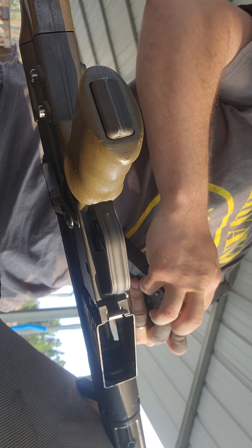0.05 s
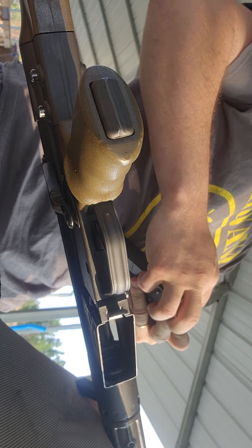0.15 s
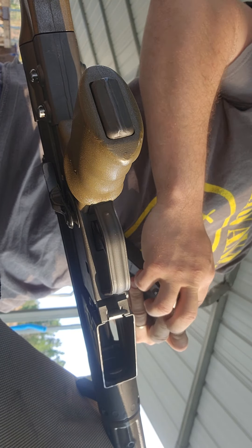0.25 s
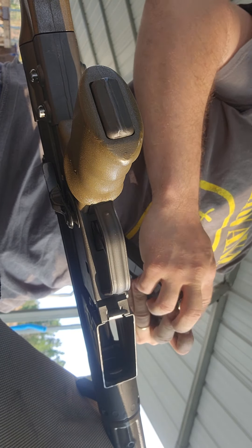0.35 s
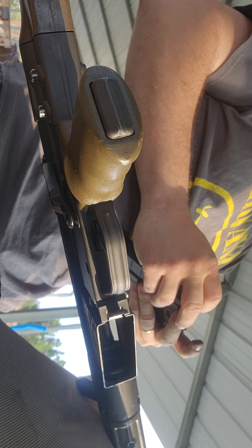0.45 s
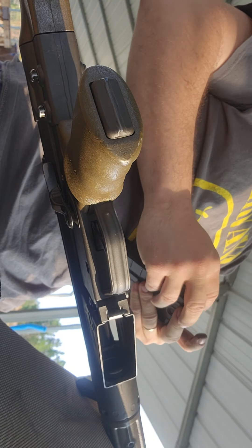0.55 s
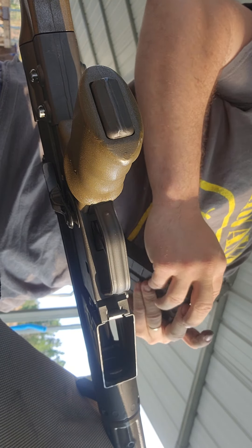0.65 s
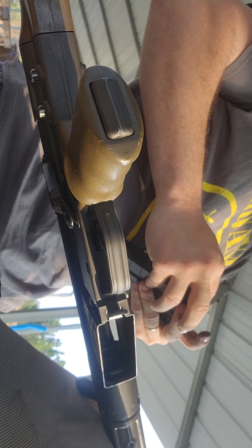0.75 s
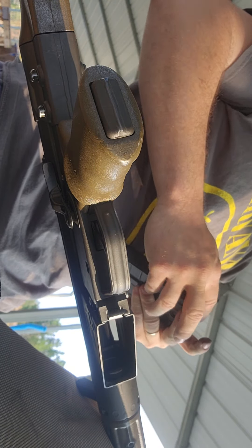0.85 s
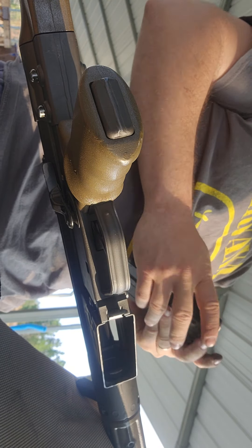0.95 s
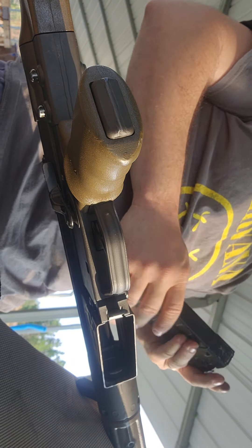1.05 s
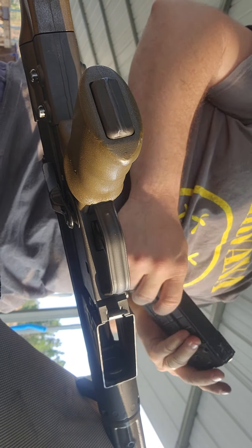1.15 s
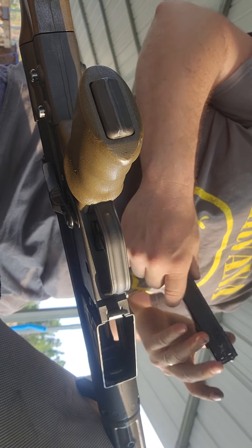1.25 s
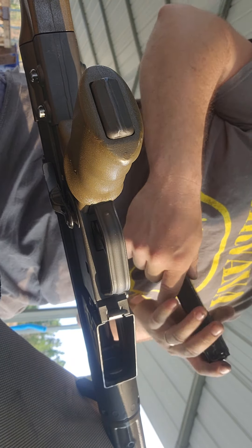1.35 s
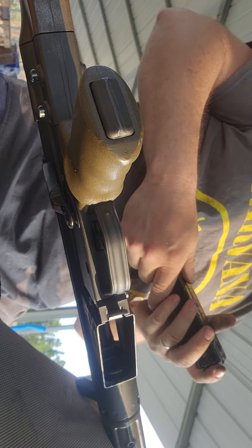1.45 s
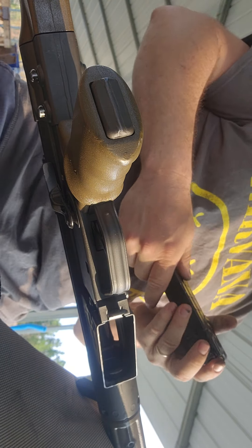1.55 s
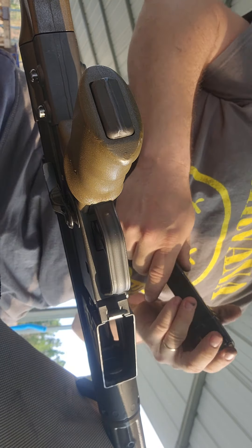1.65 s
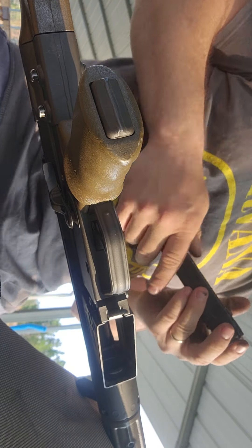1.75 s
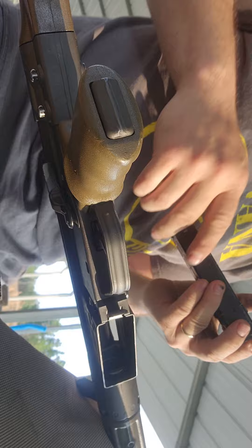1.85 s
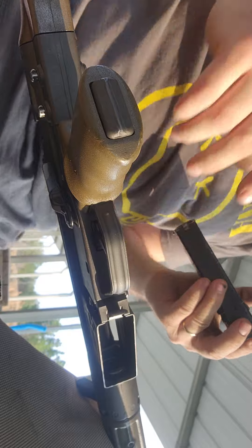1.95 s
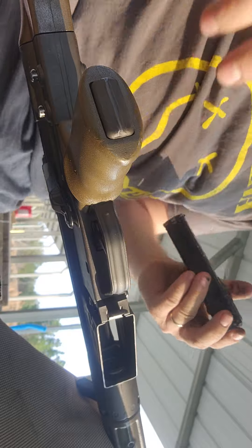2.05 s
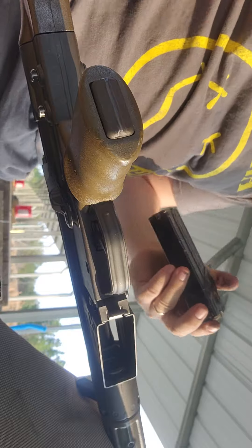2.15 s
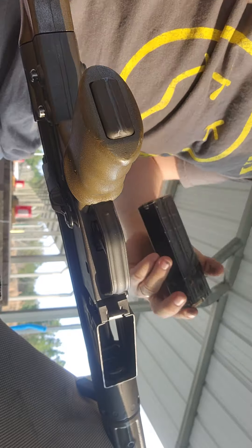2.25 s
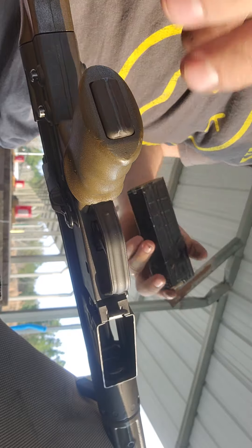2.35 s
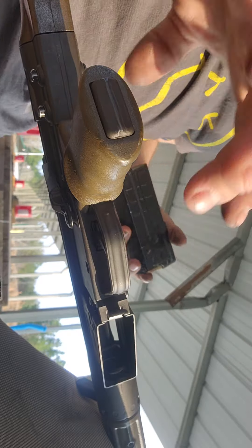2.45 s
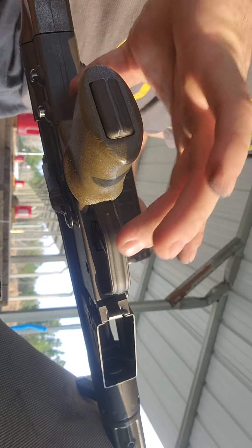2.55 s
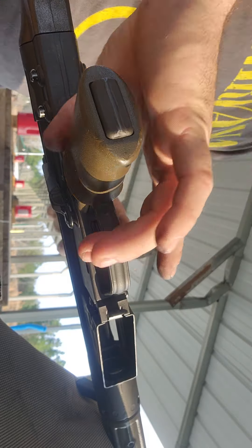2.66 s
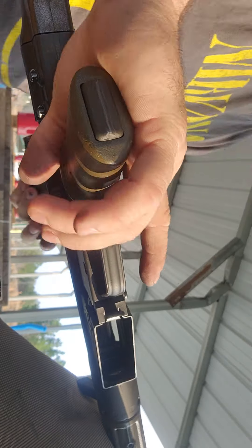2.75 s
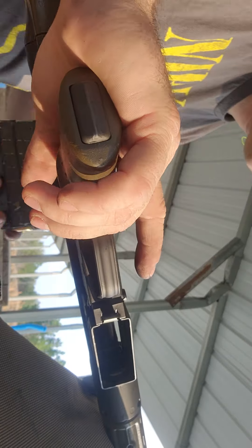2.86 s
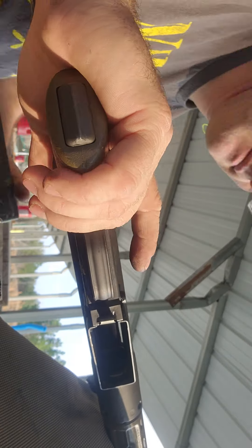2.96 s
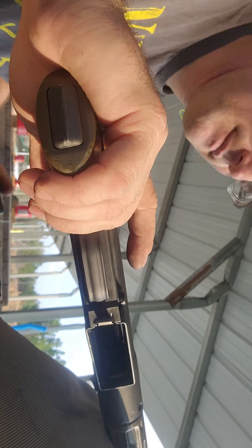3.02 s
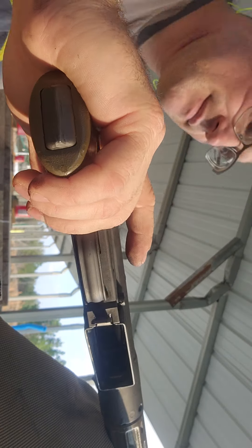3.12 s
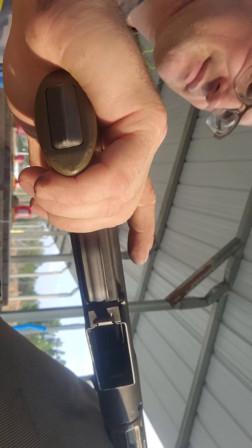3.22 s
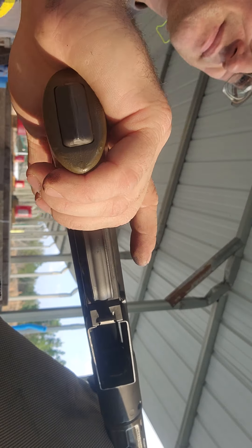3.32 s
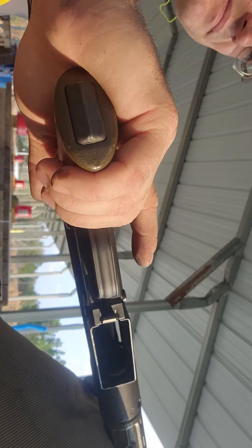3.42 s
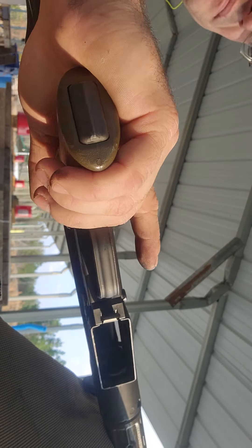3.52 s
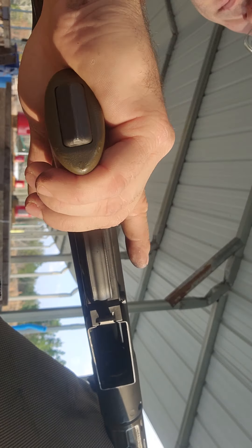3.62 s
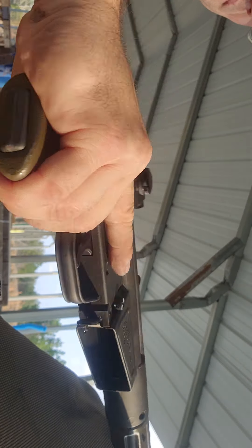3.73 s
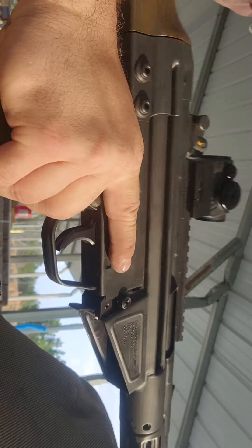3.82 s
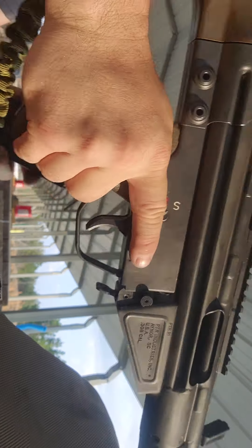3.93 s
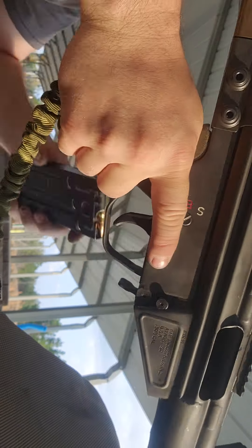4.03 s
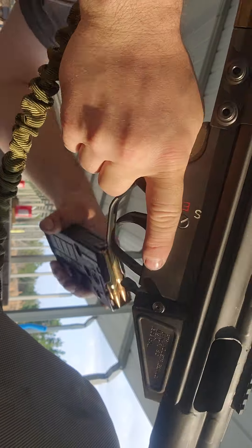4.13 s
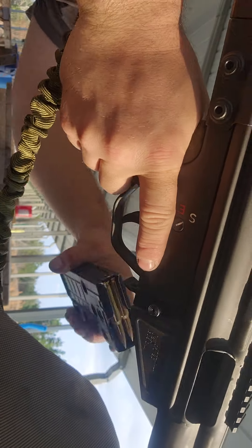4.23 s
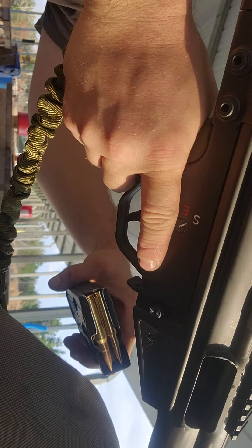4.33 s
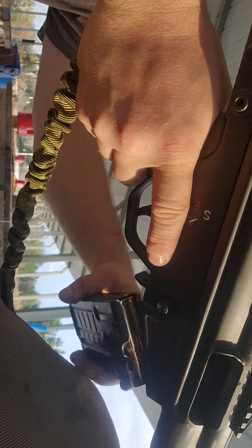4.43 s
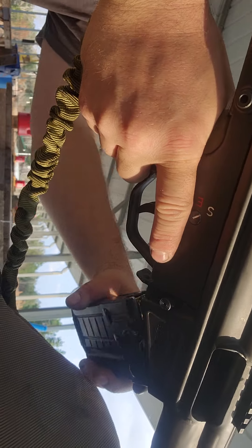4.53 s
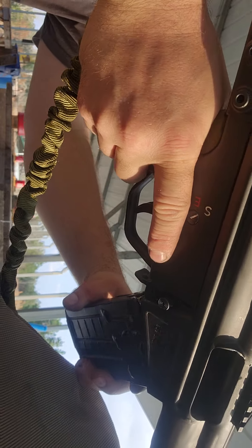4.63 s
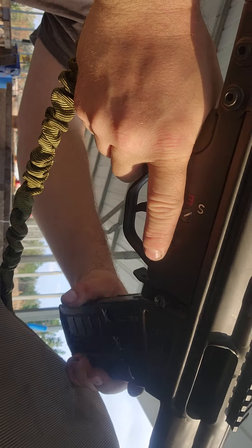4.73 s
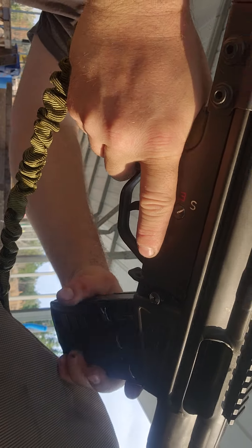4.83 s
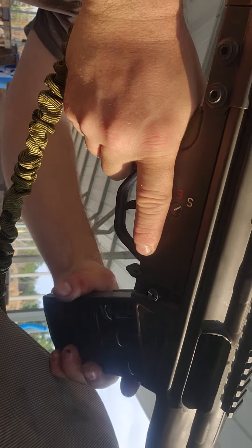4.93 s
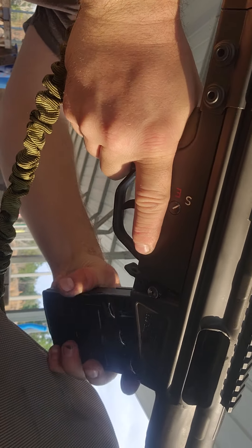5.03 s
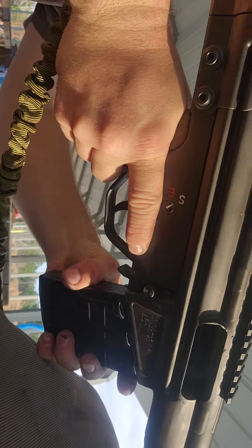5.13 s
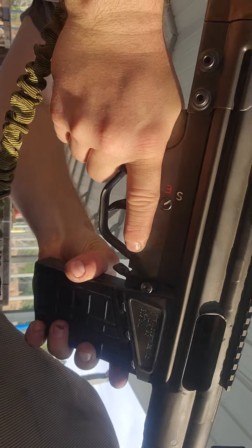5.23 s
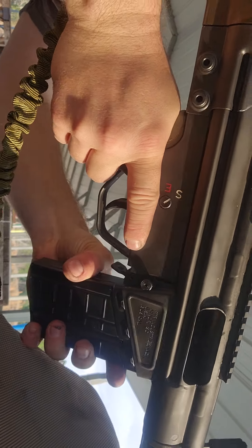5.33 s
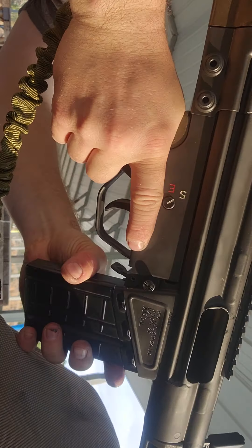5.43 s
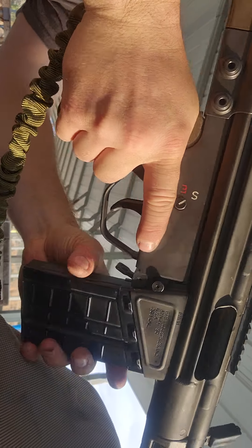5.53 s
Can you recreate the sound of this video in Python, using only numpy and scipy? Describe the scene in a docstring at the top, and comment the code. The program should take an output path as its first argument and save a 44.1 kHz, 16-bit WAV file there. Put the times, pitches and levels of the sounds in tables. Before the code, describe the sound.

Close stereo sound beneath a tin roof, over faint swelling outdoor rumble and thin steady hiss. Two small metallic ticks come just before 0.1 s, a scrape follows, and at 0.24 s a cartridge snaps hard into a thin steel magazine, ringing hollowly with a short spring twang. From 0.4 to 2 s there are only tiny taps, faint scrapes and soft cloth and finger rustles; another rustle passes near 2.55 s. At 2.9 s a dull distant shot thuds and rolls away. A hollow stock knock sounds at 4.05 s, then low swaying thumps at 4.3 s. Firm steel clunks strike the magazine well at 4.6 and 4.8 s, with quick clatter and gritty scraping until 5.0 s. The heaviest seating blow lands at 5.18 s, followed by scraping and a brief squeak into a bright, sharp catch snap at 5.33 s that echoes off the roof, leaving quiet low movement.

```python
"""A cartridge snaps into a steel rifle magazine right at the microphone, under the tin roof of a shooting range.
The magazine is turned in the hands, tapped against the rifle, scraped up its well and slammed home until
the catch snaps over. Each blow is bright steel ticks (shaped noise) plus the ringing modes of the struck part.
Scrapes and rustling sleeves are grainy noise, the rifle sways as a low decaying tone, a far shot thuds;
the roof reverberates, and faint outdoor rumble and hiss lie behind it all."""
import sys
import numpy as np
from scipy import signal
from scipy.fft import rfft, irfft, next_fast_len
from scipy.io import wavfile

SR = 44100
rng = np.random.default_rng(int(sys.argv[2]) if len(sys.argv) > 2 else 0)


def unload_audio(sound):
    """Save the sound as a 16-bit wav file, at the path given as the first command line argument."""
    columns = np.transpose(np.atleast_2d(sound))
    # keep every value between -1 and 1, then stretch to whole-number steps
    steps = np.round(np.clip(columns, -1, 1) * 32767)
    wavfile.write(sys.argv[1], SR, steps.astype(np.int16))


N = 246078
TIME = np.arange(N) / SR
AGE = TIME[:SR // 5]  # s since a contact

# Blows on the magazine, at the microphone. Columns: start_s [s], tick_db of the edge [dB], ring_db of the body [dB],
# seat_s from first touch until the part seats [s], high_hz above which little rings [Hz]
MAGAZINE_BLOWS = [ (0.0620, -33, -31, 0.00061, 5200), (0.0852, -36, -31, 0.0062, 2198),
                  (0.2433, -13, -13, 0.0036, 4540), (0.4325, -66, -44, 0.00046, 3400),
                  (0.4465, -72, -33.5, 0.00057, 3560), (0.5965, -82, -51, 0.0012, 1160),
                  (0.6545, -81.5, -46.5, 0.00043, 3100), (0.9590, -53, -49, 0.00051, 1840),
                  (0.9730, -45, -46, .001, 4080), (1.0432, -63.5, -45, 0.00036, 1070),
                  (1.1765, -59, -52, 0.00034, 1000), (1.6030, -55.5, -51, 0.0023, 1200),
                  (1.8255, -57.5, -58.5, .001, 2000), (1.9730, -48.5, -55, 0.0011, 3000),
                  (4.3400, -47, -57, 0.00046, 6260)]
# Modes of the magazine. Columns: pitch_hz [Hz], relative level_db [dB], t60_s [s]
MAGAZINE_MODES = [(349, -11, 0.085), (410, -8.5, 0.056), (561, -11, .04), (664, -1, 0.072),
                  (732, -1, 0.066), (1000, 1.5, 0.021), (1171, -8, 0.076), (1366, -6, 0.03),
                  (1437, -24.5, .14), (1590, -14.5, 0.023), (2250, -15.5, .09), (2495, -2.5, 0.014),
                  (2933, -7, .025), (3410, -20, .06), (5213, -16.5, 0.05), (5146, -19, 0.069),
                  (6240, -23.5, 0.09), (7500, -16, 0.054)]


def magazine():
    """The thin steel body rings when the cartridge, hands or rifle strike it."""
    return blows(MAGAZINE_BLOWS, MAGAZINE_MODES, lowest_hz=860, bounce_db=-8.0, tick_t60=0.042, pan_db=-7.5,
                 clatter_db=-6.5, clatter_t60=.04, tick_roof_db=0.0, ring_roof_db=-9.5)


# Blows of the magazine in the rifle's well.
# Columns: start_s [s], tick_db [dB], ring_db [dB], seat_s [s], high_hz [Hz]
RIFLE_BLOWS = [ (4.602, -26, -20.5, .002, 2420), (4.813, -34, -25, 0.0051, 2740),
               (4.8420, -43.5, -37.5, 0.0017, 4000), (4.8906, -50, -42.5, 0.0019, 2000),
               (4.9191, -33.5, -28.5, .0007, 2400), (4.999, -29.5, -28, 0.0074, 3320),
               (5.1840, -20.5, -13.5, 0.0012, 3020)]
# Modes of the receiver. Columns: pitch_hz [Hz], relative level_db [dB], t60_s [s]
RIFLE_MODES = [(125, 0, 0.11), (267, -14.5, 0.061), (381, -2, 0.018), (500, 2.5, 0.049), (590, -3, 0.034),
               (810, -15, 0.11), (1000, -23, 0.011), (1164, -5, 0.058), (1190, -7.5, 0.07),
               (1450, 5.5, 0.028), (1500, 4, 0.012), (1910, -10, 0.021), (2163, -4.5, 0.076),
               (2300, -8, 0.01), (2790, -7.5, .04), (3860, -17, 0.067), (4163, 6, 0.023), (4760, 2.5, 0.09),
               (6550, -28, .045)]


def rifle_well():
    """The receiver rings as the magazine strikes the inside of its well."""
    return blows(RIFLE_BLOWS, RIFLE_MODES, lowest_hz=557, bounce_db=-11.5, tick_t60=0.019, pan_db=-9.5,
                 clatter_db=-2.0, clatter_t60=0.044, tick_roof_db=-2.0, ring_roof_db=-12.5)


# The catch snapping over. Columns: start_s [s], tick_db [dB], ring_db [dB], seat_s [s], high_hz [Hz]
CATCH_BLOWS = [(5.3316, -15, -16.5, .0004, 11800)]
# Modes of the catch. Columns: pitch_hz [Hz], relative level_db [dB], t60_s [s]
CATCH_MODES = [(470, -31, 0.04), (647, -1.5, 0.07), (1030, -23, 0.076), (1454, 15.5, 0.045),
               (1600, -14, .04), (2054, 13, 0.019), (2950, 8.5, 0.037), (3680, -27, .04), (4060, -6, 0.072),
               (5440, 10.5, 0.029), (6260, 11, 0.032), (7900, 1, 0.047), (8100, -9, 0.031),
               (12600, 20, 0.0085), (14070, 4, .03)]


def catch():
    """The small catch rings brightly as it snaps over."""
    return blows(CATCH_BLOWS, CATCH_MODES, lowest_hz=545, bounce_db=-22, tick_t60=0.015, pan_db=9,
                 clatter_db=-13.5, clatter_t60=0.13, tick_roof_db=6.5, ring_roof_db=-2.5)


# Dull knocks against the rifle's stock and guard.
# Columns: start_s [s], tick_db [dB], ring_db [dB], seat_s [s], high_hz [Hz]
STOCK_KNOCKS = [(0.1375, -58, -44.5, 0.00045, 1112), (3.9115, -82, -50.5, 0.00058, 2180),
                (4.0495, -55.5, -24, 0.0006, 2620), (4.1685, -48.5, -46.5, 0.00048, 3000),
                (5.1175, -72, -48, 0.00039, 2200)]
# Modes of the stock. Columns: pitch_hz [Hz], relative level_db [dB], t60_s [s]
STOCK_MODES = [(293, 2, 0.021), (738, -11.5, 0.12), (856, -10.5, 0.024), (1030, -1, 0.0058),
               (1101, 5, 0.063), (1180, 8.5, 0.031), (1540, -3.5, 0.02), (2000, -11, 0.047),
               (2180, -23, 0.0087), (3000, -14, 0.0081)]


def knocks():
    """The stock and guard answer a touch with a dull ring."""
    return blows(STOCK_KNOCKS, STOCK_MODES, lowest_hz=520, bounce_db=-14, tick_t60=0.025, pan_db=-4,
                 clatter_db=-8.5, clatter_t60=0.07, tick_roof_db=3, ring_roof_db=-14.0)


# Modes of the magazine's spring. Columns: pitch_hz [Hz], relative level_db [dB], t60_s [s]
SPRING_MODES = [(1430, -8, 0.17), (2280, 0, .09)]


def spring(start_s=.2835, level_db=-33):
    """The magazine's spring settles under the new cartridge and rings briefly."""
    out = np.zeros((2, N))
    twang = ring(SPRING_MODES) * (1 - fade(AGE, .012))
    add(out, start_s, level(twang, level_db))
    return out


# Colour of a steel tick. Columns: pitch_hz [Hz], gain_db [dB]
TICK_COLOUR = [(200, -21.5), (700, -5), (1500, 0), (3000, -8), (4800, 1.5), (7500, -1), (10300, -11.5),
               (12500, -3), (14500, -5.5), (16000, -3.5)]


def blows(rows, modes, lowest_hz, bounce_db, tick_t60, pan_db, clatter_db, clatter_t60, tick_roof_db, ring_roof_db):
    """Each contact rings the part, shakes what is loose in it and ticks; returns near sound and roof feed."""
    rings, ticks = np.zeros((2, 2, N))
    deeper_oct_per_db = .085
    pan = undb(np.array([[pan_db], [-pan_db]]) / 2)  # positive leans left
    for s, ring_db, tick_db, force_db, high_hz in contacts(rows, bounce_db):
        clatter = shape(ports(len(AGE), 1100) * fade(AGE, clatter_t60), lambda hz: low_pass(hz, 2300))
        body = level(ring(modes), 0) + level(clatter, clatter_db)
        # firmer blows reach lower modes; each blow has its own upper limit
        low_hz = lowest_hz / 2 ** (deeper_oct_per_db * max(force_db, 0))
        body = shape(body, lambda hz: 1 / np.sqrt((1 + (low_hz / hz) ** 4) * (1 + (hz / high_hz) ** 6)))
        # the bite swells in about a millisecond, then decays
        bite = (fade(AGE, tick_t60) + .8 * fade(AGE, 0.0027)) * (1 - fade(AGE, .004))
        tick = shape(ports(len(AGE), 1300) * bite, lambda hz: undb(at(TICK_COLOUR, hz)))
        add(rings, s, level(body, ring_db))
        add(ticks, s, level(tick * pan, tick_db))
    # the ring reaches the microphone mostly through the metal, the tick through the air
    roof_feed = undb(ring_roof_db) * rings + undb(tick_roof_db) * ticks
    return np.array([rings + ticks, roof_feed])


def contacts(rows, bounce_db):
    """Yield the edge's bite, the seat and two bounces of each blow; heavy blows bounce harder."""
    firm_db, bite_ring_db, seat_tick_db = -30, -8, -7
    bounce_s, bounce_db_per_db = .0052, 0.33
    for s, tick_db, ring_db, seat_s, high_hz in rows:
        force_db = ring_db - firm_db  # dB over a firm blow
        yield s, ring_db + bite_ring_db, tick_db, force_db, high_hz
        for bounce in range(3):  # 0 is the seat itself
            kept_db = min(bounce_db + bounce_db_per_db * force_db, 0) * bounce ** 2
            contact_s = s + seat_s + bounce * bounce_s
            yield contact_s, ring_db + kept_db, tick_db + seat_tick_db + kept_db, force_db, high_hz


def ring(modes, scatter_db=2, apart_hz=2600, right_db=3.5):
    """Damped modes; each contact point weights them anew, and the high ones reach the ports out of step."""
    out = np.zeros((2, len(AGE)))
    draws = rng.standard_normal((len(modes), 3))
    for (hz, db, t60), (size, detune, lag) in zip(modes, draws):
        apart = min(hz / apart_hz, 1) * np.array([[-1], [1]])
        phase = 2 * np.pi * hz * (1 + 0.0043 * detune) * AGE + 0.41 * lag * apart
        gain = undb(db + scatter_db * size + right_db * apart / 2)
        out += gain * np.sin(phase) * fade(AGE, t60)
    return out


# Longer slides of steel on steel, close by, and the receiver's dull settling just after the slam (5.24 s).
# Columns: peak_s [s], length_s [s], level_db [dB], tilt_db [dB/octave]
SLIDES = [(0.18, .22, -43, -3.5), (0.62, .17, -60, -7), (1.02, 0.18, -60, -4), (2.125, .09, -53, 0.5),
          (3.63, 0.19, -55.5, 2), (3.97, 0.29, -56.5, 0), (4.88, .2, -39.5, 0.2), (5.17, 0.1, -31.5, 1.5),
          (5.24, 0.17, -41, -9), (5.52, 0.17, -58.5, -4)]
# Colour of sliding steel. Columns: pitch_hz [Hz], gain_db [dB]
SLIDE_COLOUR = [(150, -20.5), (350, -8.5), (600, 2), (850, 0), (1200, -2.5), (1700, -6), (3000, -12),
                (5200, -11.5), (9000, -19), (15000, -20.5)]


def scrapes():
    """Steel slides on steel, heard directly and through the receiver's modes."""
    sliding = strokes(SLIDES, rise_share=.42)
    sliding += skids(MAGAZINE_BLOWS, skid_db=-14) + skids(RIFLE_BLOWS, skid_db=-12.0)
    rubbing = friction(sliding, SLIDE_COLOUR, grain_db=4.0, slips_hz=450, right_db=1.5)
    return rung(rubbing, RIFLE_MODES, direct_db=-2, ring_db=-10.0)


# Steel skids briefly into each blow. One row: rise_s [s], fall_s [s], tilt_db [dB/octave]
SKID = (.024, 0.004, 2.2)


def skids(rows, skid_db):
    """A short stroke runs into each blow, its level following the edge's tick."""
    rise, fall, tilt_db = SKID
    return [(s, rise, fall, tick_db + skid_db, tilt_db) for s, tick_db, *_ in rows]


# The catch dragged over its notch. Columns: peak_s [s], length_s [s], level_db [dB], tilt_db [dB/octave]
CATCH_SLIDE = [(5.3265, .017, -22.5, 0.1)]
# Modes in which the catch squeaks. Columns: pitch_hz [Hz], relative level_db [dB], t60_s [s]
SQUEAK_MODES = [(2945, 5.5, 0.032), (4200, -4, 0.027), (5500, -5, .04), (5980, -12, 0.045),
                (7600, -15, .03), (8700, -8, .03), (13700, 5.5, 0.018)]


def squeak():
    """The dragging catch excites its own high modes."""
    drag = strokes(CATCH_SLIDE, rise_share=.7)
    rubbing = friction(drag, TICK_COLOUR, grain_db=1, slips_hz=880, right_db=16.5)
    return rung(rubbing, SQUEAK_MODES, direct_db=3.5, ring_db=1.0)


# Sleeves and fingers rubbing, close by. Columns: peak_s [s], length_s [s], level_db [dB], tilt_db [dB/octave]
RUSTLES = [(1.145, 0.091, -53.5, 2.5), (1.435, 0.082, -59, 9), (1.94, 0.27, -49.5, -2),
           (2.025, .07, -49.5, -6), (2.56, .13, -47, 0.5), (2.81, .16, -61, -0.5), (3.85, 0.3, -62.5, 7)]
# Colour of cloth. Columns: pitch_hz [Hz], gain_db [dB]
CLOTH_COLOUR = [(80, -6.5), (200, -5.5), (600, -5), (1500, -6), (3000, -4), (5500, -4), (8000, -6.5),
                (10800, -16), (13000, -8), (16000, -18.5)]


def rustles():
    """Cloth drags across the magazine's hollow body, which rings faintly along."""
    rubbing = friction(strokes(RUSTLES, rise_share=.4), CLOTH_COLOUR, grain_db=1.5, slips_hz=200, right_db=2.0)
    return rung(rubbing, MAGAZINE_MODES, direct_db=0.5, ring_db=-16.0)


def strokes(rows, rise_share):
    """Split each stroke's length into a swell and a release: (s, rise s, fall s, dB, tilt)."""
    share = np.clip(rise_share, .05, .95)
    return [(s, share * length, (1 - share) * length, db, tilt_db) for s, length, db, tilt_db in rows]


def friction(rows, colour, grain_db, slips_hz, right_db):
    """Strokes of tiny uneven slips that swell to a peak and die away; each has its own brightness."""
    out = np.zeros((2, N))
    for s, rise, fall, db, tilt_db in rows:
        start = max(s - 2 * rise, 0)
        t = np.arange(start, s + 2 * fall, 1 / SR) - s
        slip_times = np.arange(t[0], t[-1], 1 / slips_hz)
        grip = undb(np.interp(t, slip_times, grain_db * rng.standard_normal(len(slip_times))))

        def brightness(hz):
            """Colour of the material, tilted about 1 kHz."""
            return undb(at(colour, hz) + tilt_db * np.log2(np.maximum(hz, 250) / 1000))

        slips = shape(ports(len(t), 2500) * grip, brightness)
        stroke = 10 ** -np.abs(np.where(t < 0, t / rise, t / fall))  # 20 dB down after rise or fall
        add(out, start, level(slips, db, len(t) / SR) * stroke)
    return out * undb(np.array([[-right_db], [right_db]]) / 2)


def rung(x, modes, direct_db, ring_db):
    """Friction heard directly and through the modes of the rubbed part."""
    response = level(ring(modes), ring_db, 1 / SR)
    return undb(direct_db) * x + signal.fftconvolve(x, response, axes=1)[:, :N]


# The hands nudge the rifle into swaying. Columns: start_s [s], level_db [dB], t60_s [s]
PUSHES = [(2.885, -46.5, 0.57), (3.251, -52.5, 0.37), (3.861, -50.5, 2.4), (4.308, -31, 0.211),
          (4.348, -30.5, 0.23), (5.519, -44, 0.35)]


def sway(sway_hz=59.54, rumble_db=-7, left_db=1.3):
    """The whole rifle rocks on its support after each push, with a little soft rumble from the hands."""
    out = np.zeros((2, N))
    t = TIME[:SR]
    # each blow in the well sways it too, in proportion to its ring
    blow_db, blow_t60 = -19, 0.64
    jolts = [(s + seat_s, ring_db + blow_db, blow_t60) for s, _, ring_db, seat_s, _ in RIFLE_BLOWS]
    for s, db, t60 in PUSHES + jolts:
        rumble = shape(ports(len(t), 45), lambda hz: low_pass(hz, 80.8) ** 3 * (1 - low_pass(hz, 32)))
        motion = np.sqrt(2) * np.sin(2 * np.pi * sway_hz * t) + level(rumble, rumble_db, 0.82)
        add(out, s, undb(db) * motion * fade(t, t60) * (1 - fade(t, 0.042)))
    return out * undb(np.array([[left_db], [-left_db]]) / 2)


def far_shot(s=2.8825, db=-35, echo_db=-20, front_db=2):
    """A dull distant thud that rolls on between the berms."""
    t = TIME[:SR]
    # pitch_hz, gain_db
    colour = [(60, -30.0), (150, -1.0), (280, 0.5), (420, -12.5), (620, -13), (950, -28.0), (4000, -35.0), (9000, -43)]
    roll = level(shape(ports(len(t), 880), lambda hz: undb(at(colour, hz))), db, 0.98)
    front = shape(signal.unit_impulse(len(t)), lambda hz: undb(at(colour, hz)))
    front = level(front, db + front_db, 0.001)
    out = np.zeros((2, N))
    add(out, s, front + roll * (fade(t, 0.23) + undb(echo_db) * fade(t, 1.48)))
    return out


# Colour of the tin roof's reverberation. Columns: pitch_hz [Hz], gain_db [dB]
ROOF_COLOUR = [(100, -7.5), (300, 2), (900, -7.5), (2200, -1.5), (4500, -8), (9000, -5), (15000, -2.5)]
# Its decay by band. Columns: pitch_hz [Hz], t60_s [s]
ROOF_T60 = [(150, .6), (500, 0.42), (1500, 0.36), (4000, 0.39), (12000, .24)]


def roof(x, wet_db=-15, build_s=0.016, slap_s=0.024, slap_db=2):
    """Diffuse reverberation whose bands decay separately, with a cluster of reflections from the roof."""
    t = TIME[:SR * 3 // 4]
    noise = rfft(ports(len(t), 7200))
    hz = np.maximum(np.fft.rfftfreq(len(t), 1 / SR), 1)
    tail = 0
    for centre, t60 in ROOF_T60:
        share = at([(f, float(f == centre)) for f, _ in ROOF_T60], hz)  # overlapping bands sum to one
        band = irfft(noise * share * undb(at(ROOF_COLOUR, hz)), len(t))
        tail = tail + band * fade(t, t60)
    slap = undb(slap_db * np.exp(-((t - slap_s) / .012) ** 2))
    tail = tail * np.minimum(t / build_s, 1) * slap
    mono = x.sum(axis=0, keepdims=True) / np.sqrt(2)
    return signal.fftconvolve(mono, level(tail, wet_db, 1 / SR), axes=1)[:, :N]


# Colour of distant air and microphone hiss. Columns: pitch_hz [Hz], gain_db [dB]
AIR_COLOUR = [(25, -7), (60, -1.5), (120, -9.5), (230, -18), (750, -20), (1300, -22.5), (2500, -28),
              (5000, -27.5), (6800, -32), (8000, -28), (9250, -16.5), (10200, -30), (11300, -41),
              (14000, -35), (16000, -43)]


def air(base_db=-62, swell_db=5.0, swells_hz=4):
    """Faint outdoor rumble that swells and sinks under the microphone's own steady hiss."""
    noise = level(shape(ports(N, 62), lambda hz: undb(at(AIR_COLOUR, hz))), base_db, N / SR)
    outdoors = shape(noise, lambda hz: low_pass(hz, 3000))
    turns = np.arange(0, TIME[-1] + 1, 1 / swells_hz)
    swell = undb(np.interp(TIME, turns, swell_db * rng.standard_normal(len(turns))))
    return noise + (swell - 1) * outdoors


def undb(db):
    """Decibels to gain."""
    return 10 ** (np.asarray(db) / 20)


def fade(t, t60):
    """Exponential decay that loses 60 dB in t60 seconds."""
    return np.exp(-np.log(1000) * t / max(t60, 1e-3))


def at(points, hz):
    """Read (Hz, value) points on a log-frequency axis."""
    f, value = np.transpose(points)
    return np.interp(np.log(hz), np.log(f), value)


def low_pass(hz, corner_hz):
    """Gain of a gentle low-pass."""
    return corner_hz / np.hypot(hz, corner_hz)


def shape(x, gain):
    """Filter with a gain given as a function of frequency, causally, so attacks stay sharp."""
    size = next_fast_len(x.shape[-1] + 2048)
    size += size % 2
    hz = np.maximum(np.fft.rfftfreq(size, 1 / SR), 1)
    # folding the cepstrum forward gives minimum phase
    cepstrum = irfft(np.log(gain(hz) + 1e-6))
    cepstrum[1:size // 2] *= 2
    cepstrum[size // 2 + 1:] = 0
    return irfft(rfft(x, size) * np.exp(rfft(cepstrum)))[..., :x.shape[-1]]


def level(x, db, span_s=1 / 100):
    """Scale a sound so that its energy, spread over span_s, has the given level."""
    energy = np.mean(np.sum(x ** 2, axis=-1))
    return x * undb(db) / np.sqrt(energy / (span_s * SR))


def ports(size, apart_hz):
    """Noise at two microphone ports: alike in the bass, unrelated above apart_hz."""
    mid, side = rng.standard_normal((2, size))
    side = shape(side, lambda hz: hz / np.hypot(hz, apart_hz))
    mid = shape(mid, lambda hz: np.sqrt(2 - (hz / np.hypot(hz, apart_hz)) ** 2))
    return np.array([mid + side, mid - side]) / np.sqrt(2)


def add(out, s, sound):
    """Mix a sound in at time s."""
    start = int(np.clip(s * SR, 0, N - 1))
    out[:, start:start + sound.shape[-1]] += sound[..., :N - start]


def scene():
    """Steel and cloth close by, the roof above, the range beyond."""
    near, upward = magazine() + rifle_well() + catch() + knocks()
    scraping, squeaking = scrapes(), squeak()
    reverberation = roof(upward + undb(-6) * scraping + undb(-10) * squeaking)
    handling = near + spring() + scraping + squeaking + rustles() + sway()
    return handling + far_shot() + reverberation + air()


def record(dry):
    """The recorder clips at full scale, then a steep low-pass cuts the top."""
    top_hz = 15900
    cut = signal.ellip(8, .2, 70, top_hz, fs=SR, output="sos")
    return signal.sosfilt(cut, np.clip(dry, -1, 1))


dry = scene()
out = record(dry)
unload_audio(out)
```